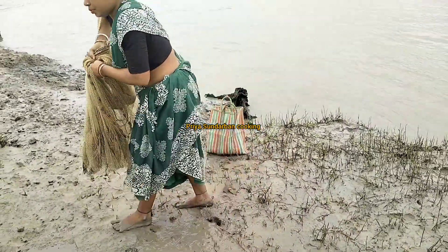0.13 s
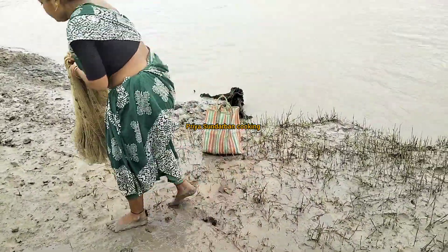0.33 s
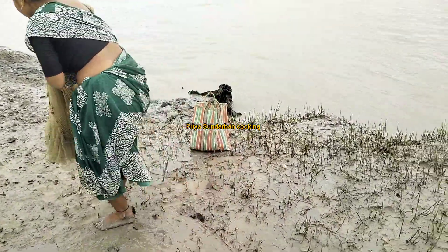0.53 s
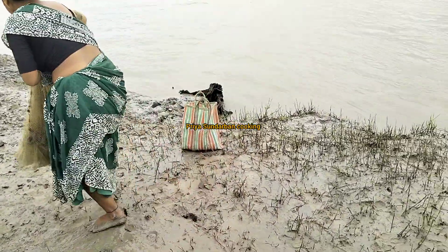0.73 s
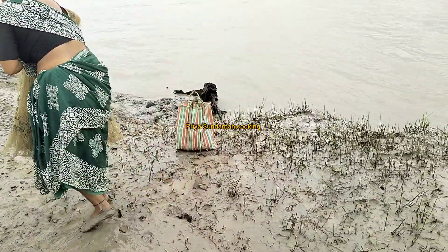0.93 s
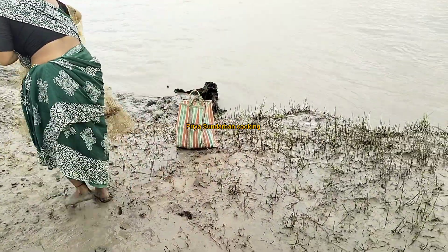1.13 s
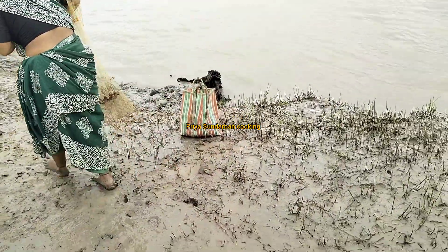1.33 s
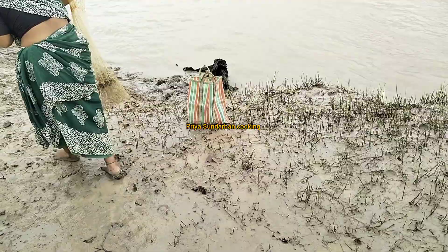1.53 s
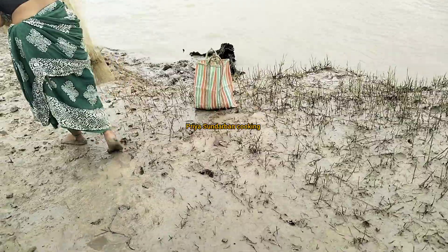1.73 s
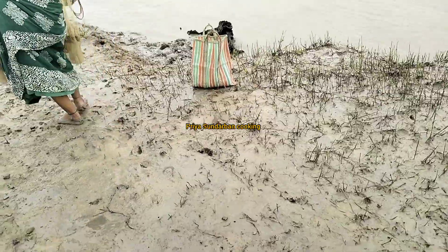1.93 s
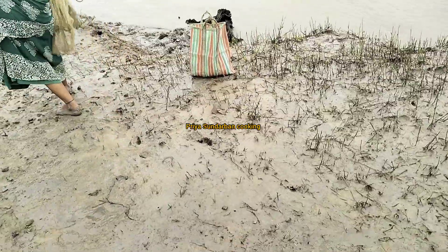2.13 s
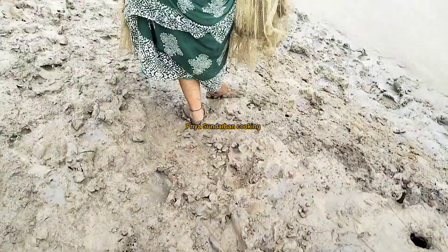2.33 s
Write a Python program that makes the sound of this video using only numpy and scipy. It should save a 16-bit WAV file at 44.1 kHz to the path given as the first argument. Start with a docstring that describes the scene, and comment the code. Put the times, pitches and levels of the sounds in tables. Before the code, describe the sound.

Wet mud footsteps: small sticky clicks and smears, three sharp close squelches, wind buffeting and handling knocks

```python
"""Faint hiss, a thin whine and light wind rumble, then wet clicks and smears of bare feet in soft river mud.
Three sharp close squelches follow: grainy noise bursts of spray and bubbling. Steps further left are
shorter bursts with ringing cavities; trapped air rings as rising damped sines. The hand that holds the
microphone creaks (uneven slip pulses) and knocks on the case (damped rings); wind is filtered noise on
the two ports. All sound stops abruptly shortly before the end."""
import sys
import numpy as np
from scipy import signal
from scipy.fft import rfft, irfft
from scipy.io import wavfile

SR = 44100
rng = np.random.default_rng(int(sys.argv[2]) if len(sys.argv) > 2 else 0)


def master(y):
    """Save y as 16-bit WAV."""
    cut = np.clip(np.atleast_2d(y).T, -1, 1)
    pcm = np.round(cut * 32767)  # scale
    wavfile.write(sys.argv[1], SR, pcm.astype(np.int16))


N = 108045
T = np.arange(N) / SR
STOP_S, TOP_HZ = 2.214, 16200

# pan_db is left minus right; likeness is the share of power common to both ports
# far outdoor air: hz, gain_db
AIR_COLOUR = [(60, 16), (300, 4), (600, -1), (1050, 3), (1600, 1.5), (2500, -2.5), (3700, -15), (5500, -13),
              (7500, -17.5), (11000, -18.5), (14300, -3.5), (16000, -24)]
AIR_DB = -59
# wind on the ports: time_s, left_db, right_db
WIND_LEVELS = [(0, -56, -71), (.14, -57, -44.5), (.22, -38, -48), (.48, -34, -53), (.6, -47, -48.5),
               (.8, -42.5, -51), (.95, -53, -45), (1.03, -35.5, -55), (1.11, -50, -49.5),
               (1.22, -37.5, -51.5), (1.55, -46.5, -48.5), (1.75, -40.5, -40), (2.02, -41.5, -50),
               (2.2, -32, -49.5)]
# wind spectrum: hz, gain_db
WIND_COLOUR = [(15, -17.5), (30, -10.5), (48, 1.5), (95, -4), (150, -15), (260, -27), (500, -50),
               (2000, -67.5), (16000, -98.5)]

# whine partials: harmonic_number, level_db
WHINE_HARMONICS = [(3, -13), (4, -2), (5, -10), (6, -16)]
WHINE_HZ, WHINE_SAG_HZ_PER_S = 404, 420  # of the fundamental
WHINE_DB, WHINE_HOLD_S, WHINE_FADE_S, WHINE_PAN_DB = -54.5, 0.13, 0.055, -35.5

# knocks beside the right port: start_s, relative_level_db, ring_hz
KNOCKS = [(1.5887, -23.5, 740), (1.5909, -15.5, 1055), (1.6115, -37.5, 700), (1.6354, -20, 575),
          (1.667, -38, 800)]
# knock crack spectrum: hz, gain_db
KNOCK_COLOUR = [(60, 13.5), (200, 20.5), (500, 2.5), (1100, -9), (1700, 1), (2500, -2), (3600, -27.5),
                (6000, -20), (9000, -72.5), (16000, -35.5)]
KNOCK_CYCLES, KNOCK_CRACK_DB, KNOCK_PAN_DB = 0.66, -4.5, -36.5
# low bumps on the case: start_s, level_db, pitch_hz, swell_s, pan_db
BUMPS = [(.304, -27, 95, 0.0043, 25), (.37, -25, 70, 0.0056, 30), (.4838, -23.5, 137, 0.0036, 33),
         (.532, -30.5, 88, 0.0037, 16), (1.5945, -20.5, 52, 0.0089, -17.5), (1.5955, -22, 130, .002, -22),
         (1.6398, -18.5, 80, .0035, -24), (1.636, -30, 356, 0.0019, -22), (2.0945, -23.5, 130, .0026, 10.5),
         (2.171, -28.5, 224, 0.0032, 21), (2.097, -34, 285, 0.0029, -3), (.181, -34.5, 106, 0.0061, 6)]

# sharp jerks of the grip: time_s, level_db
JERKS = [(.427, -5), (.4318, -8.5), (0.4453, -7.5), (.4918, -18), (.5405, -15.5), (.57, -15.5),
         (.6575, -16.5), (.7315, -17.5), (.8267, -17), (0.8348, -18)]
# creak of the grip: time_s, level_db
CREAK_LEVELS = [(.41, -57), (.425, -38.5), (.46, -46), (.56, -47), (.6, -53), (.66, -48), (.82, -46),
                (.86, -49), (.88, -73)]
# creak spectrum: hz, gain_db
CREAK_COLOUR = [(40, -6.5), (150, 6.5), (400, -9), (800, -17), (1500, -14.5), (2100, -30), (3500, -29.5),
                (6000, -43), (9000, -51), (16000, -66)]
CREAK_PAN_DB, CREAK_LIKENESS = -6, 0.83
SLIP_MEDIAN_GAP_S, SLIP_GAP_LOG_SPREAD, SLIP_SCATTER_DB = 1 / 260, 0.7, 2
SLIP_RING_MEDIAN_HZ, SLIP_RING_LOG_SPREAD, SLIP_RING_CYCLES = 854, 0.6, 2.7
SLIP_RING_DB, SLIP_GRIT_DB = -12, -10.5

# air bubbles in the mud: start_s, level_db, pitch_hz, decay_s
BUBBLES = [(0.259, -57, 686, 0.027), (.292, -55, 836, 0.025), (1.078, -42, 860, 0.0064),
           (1.147, -39.5, 906, 0.004), (1.305, -53.5, 650, 0.021), (1.487, -44.5, 1094, 0.0043),
           (1.493, -41.5, 933, 0.0096), (1.96, -46, 1003, 0.0045), (2.025, -48.5, 890, 0.0033)]
BUBBLE_RISE_PER_S, BUBBLE_PAN_DB = 3.6, -11

# soles smearing through mud: peak_s, rise_s, fall_s, level_db
SMEARS = [(.165, 0.1, 0.017, -86), (0.319, 0.16, 0.079, -52), (1.076, 0.047, 0.011, -43),
          (1.251, 0.082, 0.017, -58), (1.35, 0.025, 0.013, -54.5), (1.511, 0.081, 0.045, -53),
          (1.96, .03, 0.045, -55.5), (2.169, .04, 0.12, -61)]
# wet clicks: peak_s, level_db, cavity_hz, cavity_db (before halving), decay_s, pan_db
CLICKS = [(0.136, -41, 2130, 2.5, 0.0039, 7), (.143, -56, 2330, 23, 0.0038, -2.5),
          (0.193, -49, 1770, 12, 0.0038, -10), (0.225, -48, 6040, 4, 0.0021, 18),
          (.344, -54, 2306, 12.5, 0.0087, -3), (0.434, -37, 1510, -4, 0.0026, -15),
          (0.4418, -47, 1500, -2, 0.0013, -5), (0.45, -50, 4800, 16.5, 0.0016, -1),
          (0.584, -46, 5040, -28, .002, 14), (0.691, -51, 1470, 8, 0.001, 3),
          (0.9084, -34, 6100, -0.5, 0.0021, 0.5), (1.041, -57.5, 1800, 14, 0.033, -13),
          (1.084, -44.5, 2240, 8.5, 0.0058, -1), (1.0755, -34.5, 2100, -3.5, 0.0057, 0.5),
          (1.094, -34.5, 5700, 10.5, .002, -1), (1.1445, -33, 1760, -3, 0.0053, 4),
          (1.156, -43, 2500, 5.5, 0.0038, -11), (1.346, -41.5, 3200, 6, 0.0022, 8),
          (1.367, -42, 2420, -1.5, .002, 2), (1.4054, -42, 3900, 6.5, .005, -1.5),
          (1.434, -35.5, 4320, 9.5, .0011, 0.5), (1.286, -52, 4010, 5.5, 0.0059, -7),
          (1.5245, -45.5, 4900, 4.5, 0.0022, 1), (2.052, -48.5, 4650, 7.5, 0.013, -9),
          (1.577, -39, 5806, 6, .001, -11.5), (1.758, -50, 5870, -9, .002, 19),
          (1.911, -46.5, 1867, -24, 0.0031, -3.5), (1.945, -40, 2290, -20, .002, -0.5),
          (1.961, -44.5, 4320, -4, .005, 6), (2.007, -43.5, 2043, 1, .004, 2),
          (2.128, -42, 1500, 4.5, 0.0014, -8.5), (2.162, -44.5, 5780, 2.5, 0.0019, 5.5),
          (2.188, -43.5, 2196, -2.5, 0.0052, -2)]
# wet film spectrum: hz, gain_db
WET_COLOUR = [(200, -28.5), (600, -10), (1000, -5.5), (1800, -1.5), (3500, -5.5), (5000, -4.5), (6300, -4),
              (7300, -15), (10500, -5.5), (15800, -6.5)]
STEP_LIKENESS, STEP_LAG_S = 0.26, 0.00045
SMEAR_GRAIN_DB, CLICK_GRAIN_DB = 4.2, 3.8
CAVITY_Q, CLICK_RISE_S = 3.9, 0.00022
CLICK_TAIL_RISE_S, CLICK_TAIL_S, CLICK_TAIL_DB = 0.00018, 0.017, -20.5

# close squelches: peak_s, level_db, bubbly_db (relative), tail_db (relative), pan_db
SQUELCHES = [(0.4131, -18.5, -3, -12.5, -4.5), (1.5502, -17, 1, -20, -4.5), (2.0861, -19, 1, -11.5, -7)]
# spray spectrum: hz, gain_db
SPRAY_COLOUR = [(1000, -13.5), (2300, -3), (3600, -7.5), (4400, -1), (5600, 1.5), (6200, -8), (7100, -10),
                (7900, -18.5), (9800, -19.5), (11000, -13), (12300, -2), (14000, -9.5), (15800, -14)]
# bubbling spectrum, also used for the grip's grit: hz, gain_db
BUBBLY_COLOUR = [(100, -23.5), (420, -5.5), (620, -20), (980, -11), (1400, -0.5), (2300, -7.5),
                 (3300, -20.5), (6000, -42), (16000, -58)]
SQUELCH_LIKENESS, SQUELCH_GRAIN_DB = 0.55, 2.5
SPRAY_RISE_S, SPRAY_FALL_S = 0.0023, 0.003
LEAD_S, LEAD_DB, TAIL_S = 0.012, -16.5, 0.01
BUBBLY_DB, BUBBLY_RISE_S, BUBBLY_FALL_S = -6, 0.0015, 0.0038
SPLUTTER_S, SPLUTTER_GRAIN_DB = 0.022, 4.5


def undb(db):
    """Decibels to gain."""
    return 10 ** (np.asarray(db) / 20)


def unit(x):
    """Scale to an rms of 1."""
    return x / np.sqrt(np.mean(x ** 2) + 1e-18)


def curve(rows):
    """Gain over time from (time_s, level_db) rows."""
    return undb(np.interp(T, *np.array(rows).T))


def pan(db):
    """Left and right gains of constant power."""
    return unit(undb(np.array([[db], [-db]]) / 2))


def colour(x, points):
    """Causal minimum-phase filter of unit power gain through (hz, gain_db) points."""
    size = 2 ** 17
    hz, db = np.array(points).T
    bins_hz = np.arange(size // 2 + 1) * SR / size
    gain = unit(undb(np.interp(np.log(bins_hz + 1), np.log(hz), db)))
    # folding the cepstrum makes the phase minimal
    cepstrum = irfft(np.log(gain))
    cepstrum[1:size // 2] *= 2
    cepstrum[size // 2 + 1:] = 0
    response = np.exp(rfft(cepstrum))
    return irfft(rfft(x, size) * response, size)[..., :N]


def ports(three, likeness):
    """Mix one shared and two separate signals to left and right."""
    share = np.clip(likeness, 0, 1)
    return np.sqrt(share) * three[0] + np.sqrt(1 - share) * three[1:]


def grains(scatter_db, likeness):
    """Dense tiny bursts of wet film, 8 samples each, a few much larger than the rest."""
    size = undb(scatter_db * np.minimum(rng.exponential(size=N // 8 + 1), 6))
    noise = ports(rng.standard_normal((3, N)), likeness)
    return unit(noise * np.repeat(size, 8)[:N])


def swell(at, rise, fall):
    """Exponential rise to a peak and fall from it."""
    return np.exp(-np.minimum(np.maximum((at - T) / rise, (T - at) / fall), 40))


def burst(x, envelope):
    """Grains under an envelope, with the energy of that envelope."""
    return unit(x * envelope) * np.sqrt(np.mean(envelope ** 2))


def ring(age, hz, decay, glide=0):
    """A damped oscillation whose pitch may rise."""
    age = np.maximum(age, 0)
    envelope = np.exp(-np.minimum(age / decay, 40))
    return envelope * np.sin(2 * np.pi * hz * age * (1 + glide * age / 2))


def outdoors():
    """Wind buffets each port on its own, mostly the left, over a far hiss."""
    left = curve([(at, left_db) for at, left_db, _ in WIND_LEVELS])
    right = curve([(at, right_db) for at, _, right_db in WIND_LEVELS])
    wind = unit(colour(rng.standard_normal((2, N)), WIND_COLOUR)) * np.array([left, right])
    hiss = colour(rng.standard_normal((2, N)), AIR_COLOUR) * undb(AIR_DB)
    return wind + hiss


def whine():
    """A thin harmonic whine on the right holds, then sags and fades."""
    late = np.clip(T - WHINE_HOLD_S, 0, 1)
    phase = 2 * np.pi * np.cumsum(WHINE_HZ - WHINE_SAG_HZ_PER_S * late) / SR
    tone = sum(undb(db) * np.sin(round(k) * phase) for k, db in WHINE_HARMONICS)
    return tone * np.exp(-late / WHINE_FADE_S) * undb(WHINE_DB) * pan(WHINE_PAN_DB)


def case():
    """The hand on the case: dull, briefly ringing knocks and low bumps."""
    taps, body = np.zeros(N), 0
    for at, db, hz in KNOCKS:
        taps[int(at * SR)] += undb(db + KNOCK_CRACK_DB) * 10
        body = body + 2 * undb(db) * ring(T - at, hz, KNOCK_CYCLES / hz)
    body = signal.sosfilt(signal.butter(4, 2800, fs=SR, output="sos"), body)
    out = (body - colour(taps, KNOCK_COLOUR)) * pan(KNOCK_PAN_DB)
    for at, db, hz, swell_s, pan_db in BUMPS:
        age = np.maximum(T - at, 0)
        onset = np.e * age / swell_s  # envelope peaks at 1 after swell_s
        out = out + undb(db) * onset * ring(age, hz, swell_s) * pan(pan_db)
    return out


def grip():
    """A finger sticks and slips on the case in uneven pulses; each rings at its own pitch and crunches grit."""
    chance = rng.standard_normal((600, 6)).T
    gaps_s = SLIP_MEDIAN_GAP_S * np.exp(SLIP_GAP_LOG_SPREAD * np.minimum(chance[0], 2))
    starts = (np.cumsum(gaps_s) * SR).astype(int)
    sizes = undb(SLIP_SCATTER_DB * np.clip(chance[1:5], -2, 2))
    pitches_hz = SLIP_RING_MEDIAN_HZ * np.exp(SLIP_RING_LOG_SPREAD * np.clip(chance[5], -2, 1.5))
    pulses = np.array([np.bincount(starts, size, N)[:N] for size in sizes[:3]])
    pushes = ports(pulses, CREAK_LIKENESS)

    rings, grit = np.zeros(N), np.zeros(N)
    for start, size, hz in zip(starts[starts < N], sizes[3], pitches_hz):
        age = T[:min(1000, N - start)]
        span = slice(start, start + len(age))
        rings[span] += size * ring(age, hz, SLIP_RING_CYCLES / hz)
        grit[span] += size ** 3 * np.exp(-age / 0.0008)  # large slips crunch far more
    crunch = unit(colour(grit * rng.standard_normal(N), BUBBLY_COLOUR))

    creak = unit(colour(pushes - pushes.mean(), CREAK_COLOUR))
    creak = creak + undb(SLIP_RING_DB) * unit(rings) + undb(SLIP_GRIT_DB) * crunch
    jerks = sum(undb(db) * signal.unit_impulse(N, int(at * SR)) for at, db in JERKS)
    return -(creak * curve(CREAK_LEVELS) + colour(jerks, CREAK_COLOUR)) * pan(CREAK_PAN_DB)


def bubbles():
    """Trapped air rings briefly and rises in pitch as it surfaces."""
    out = 0
    for at, db, hz, decay in BUBBLES:
        out = out + undb(db) * ring(T - at, hz, decay, BUBBLE_RISE_PER_S)
    return out * pan(BUBBLE_PAN_DB)


def steps():
    """Soles smear the mud, and pockets snap open and ring their cavities; the left port hears it first."""
    film = colour(grains(SMEAR_GRAIN_DB, STEP_LIKENESS), WET_COLOUR)
    smears = film * sum(undb(db) * swell(at, rise, fall) for at, rise, fall, db in SMEARS)
    crackle, snaps = grains(CLICK_GRAIN_DB, STEP_LIKENESS), 0
    for at, db, hz, cavity_db, decay, pan_db in CLICKS:
        tail = undb(CLICK_TAIL_DB) * swell(at, CLICK_TAIL_RISE_S, CLICK_TAIL_S)
        snap = burst(crackle, swell(at, CLICK_RISE_S, decay) + tail)
        resonator = signal.iirpeak(hz, CAVITY_Q, fs=SR)
        cavity = unit(signal.lfilter(*resonator, snap)) * np.std(snap)
        snaps = snaps + (snap + undb(cavity_db) * cavity / 2) * undb(db) * pan(pan_db)
    left, right = smears + colour(snaps, WET_COLOUR)
    return np.array([left, np.interp(T - STEP_LAG_S, T, right)])


def squelches():
    """Mud squirts out under a sole: spray builds to a sharp peak, then bubbling splutters on briefly."""
    fine, coarse = (grains(SQUELCH_GRAIN_DB, SQUELCH_LIKENESS) for _ in range(2))
    splutter = grains(SPLUTTER_GRAIN_DB, SQUELCH_LIKENESS)
    spray = bubbling = 0
    for at, db, bubbly_db, tail_db, pan_db in SQUELCHES:
        skirt = swell(at, LEAD_S, TAIL_S) * undb(np.where(T < at, LEAD_DB, tail_db))
        squirt = burst(fine, swell(at, SPRAY_RISE_S, SPRAY_FALL_S) + skirt)
        spray = spray + squirt * undb(db) * pan(pan_db)
        trail = (T > at) * np.exp(-np.minimum(((T - at) / SPLUTTER_S) ** 2, 40))
        body = burst(coarse, swell(at, BUBBLY_RISE_S, BUBBLY_FALL_S))
        body = body + undb(tail_db) * burst(splutter, trail)
        bubbling = bubbling + body * undb(db + bubbly_db + BUBBLY_DB) * pan(pan_db)
    return colour(spray, SPRAY_COLOUR) + colour(bubbling, BUBBLY_COLOUR)


def scene():
    """Weather, hand and mud together."""
    return outdoors() + whine() + case() + grip() + bubbles() + steps() + squelches()


def record(dry):
    """The sound is switched off abruptly; the top is cut."""
    gate = np.clip((STOP_S - T) / 0.0016, 0, 1)
    low_pass = signal.ellip(10, 0.2, 80, TOP_HZ, fs=SR, output="sos")
    return signal.sosfilt(low_pass, dry * gate)


dry = scene()
out = record(dry)
master(out)
```